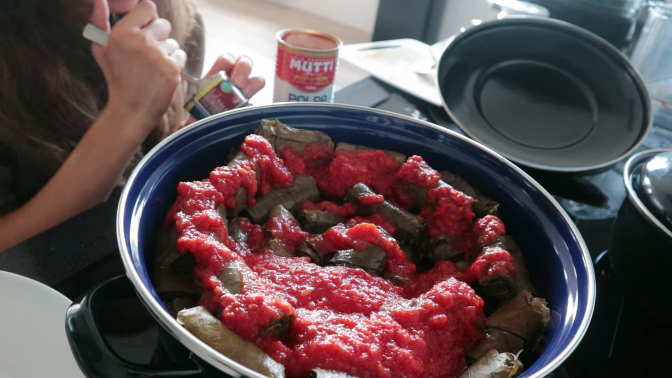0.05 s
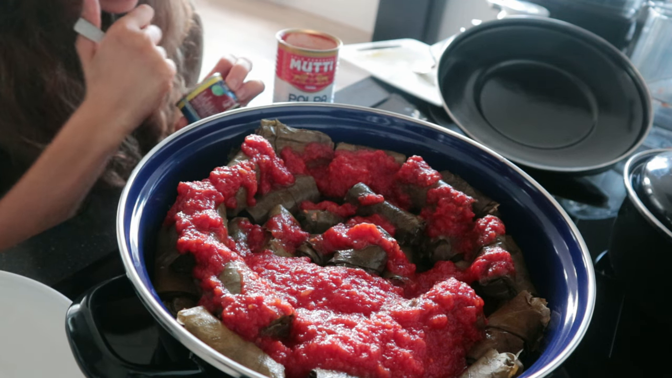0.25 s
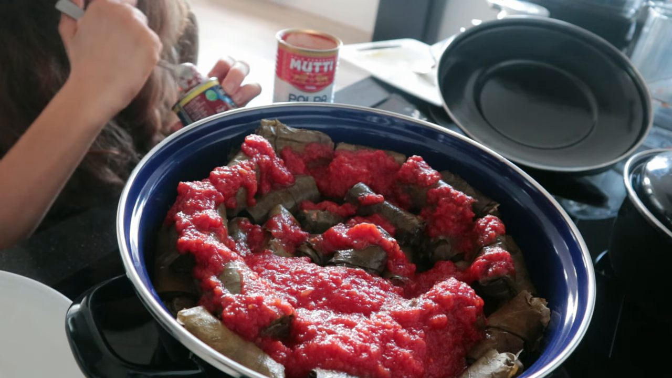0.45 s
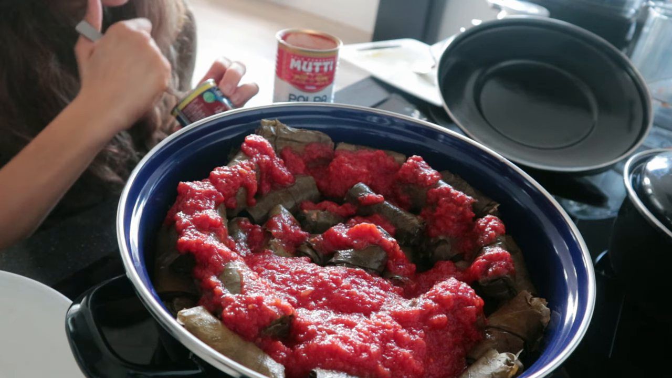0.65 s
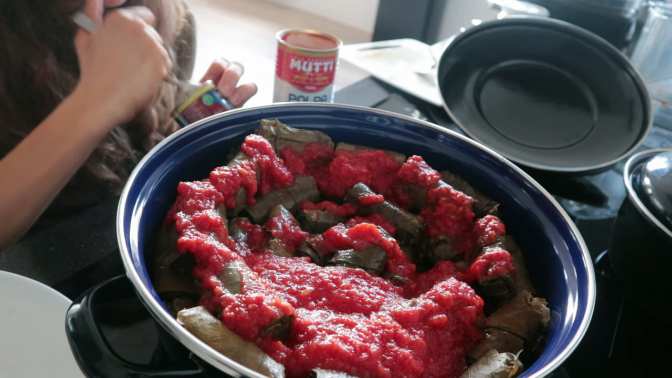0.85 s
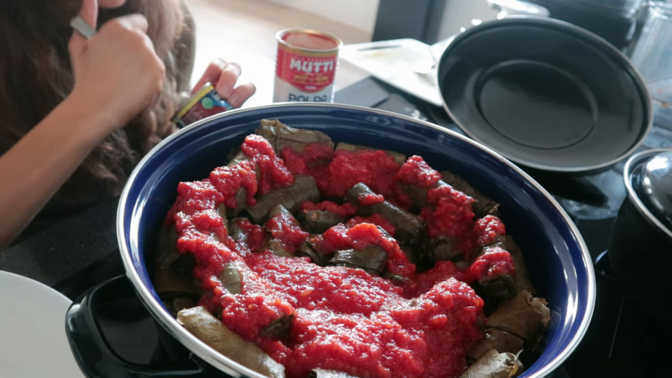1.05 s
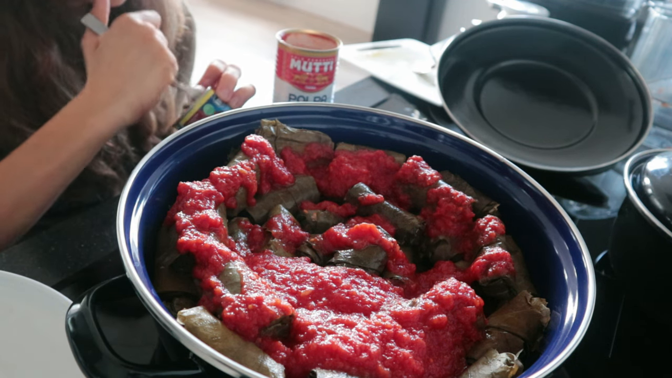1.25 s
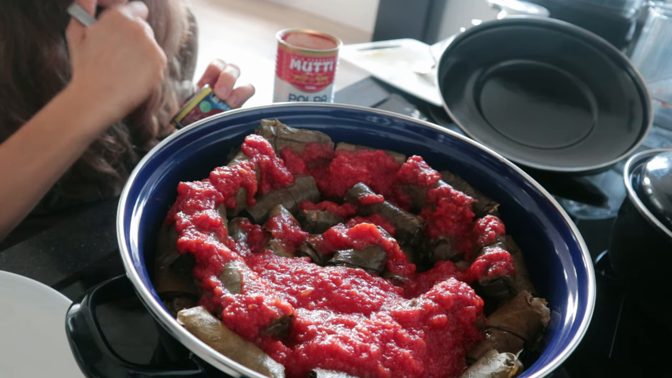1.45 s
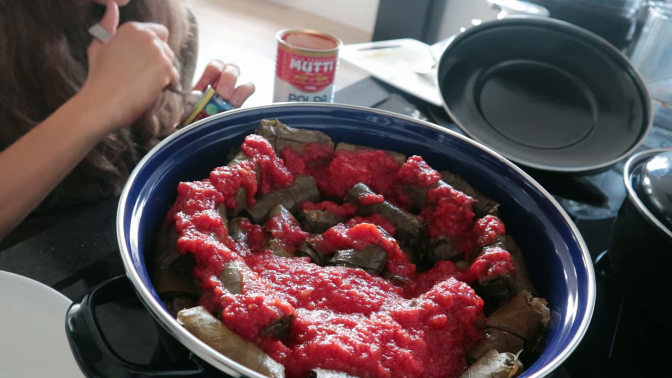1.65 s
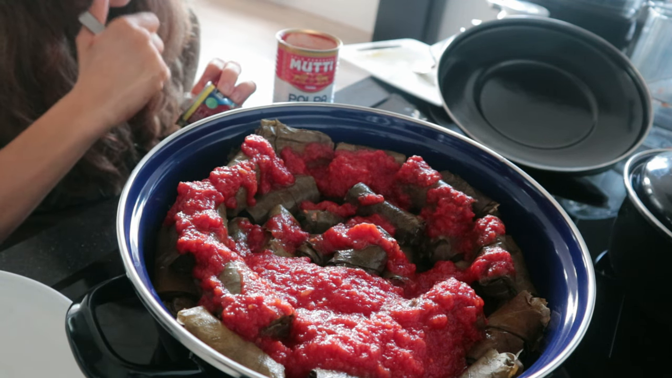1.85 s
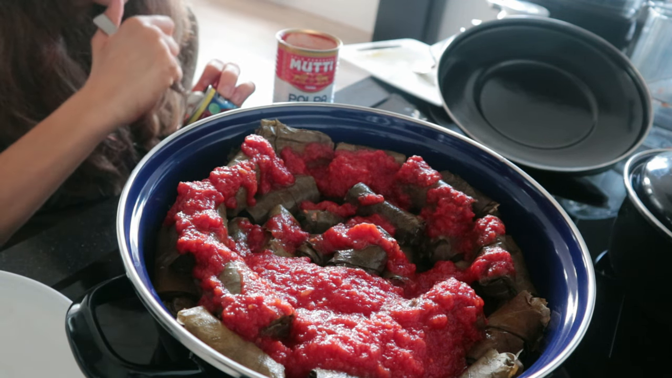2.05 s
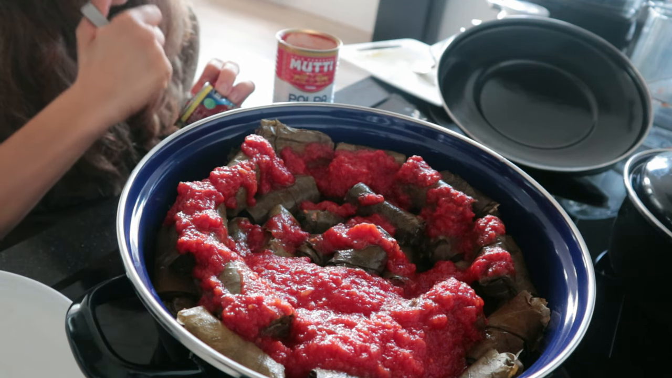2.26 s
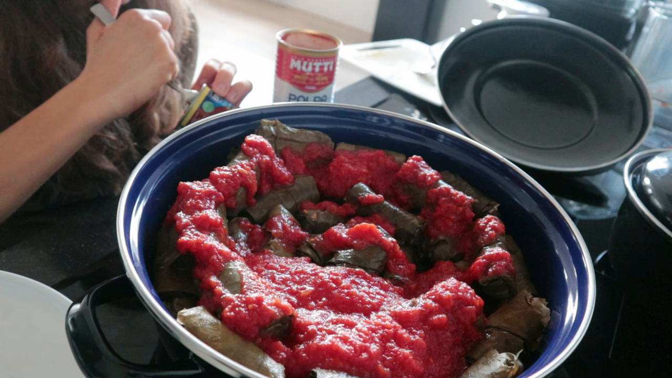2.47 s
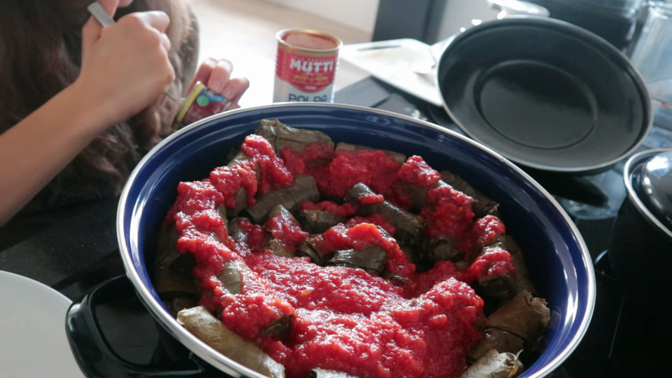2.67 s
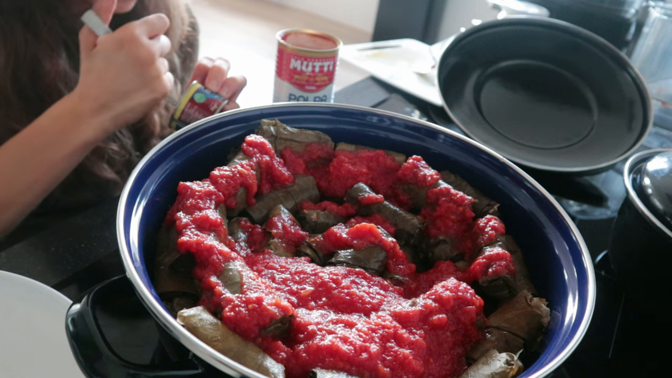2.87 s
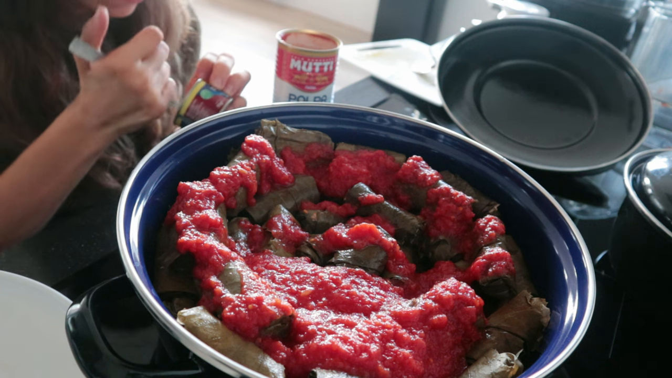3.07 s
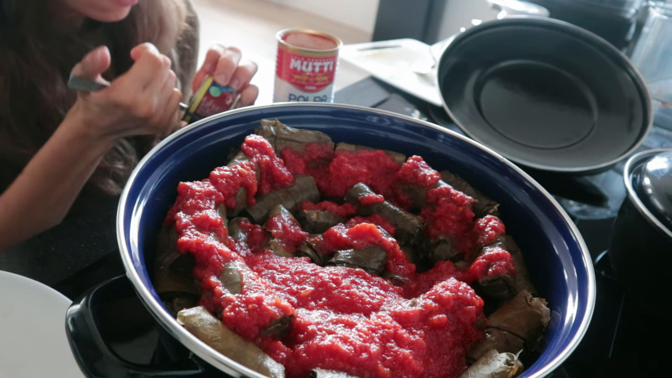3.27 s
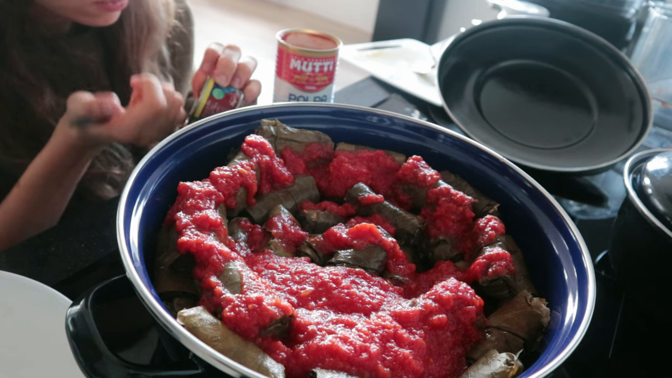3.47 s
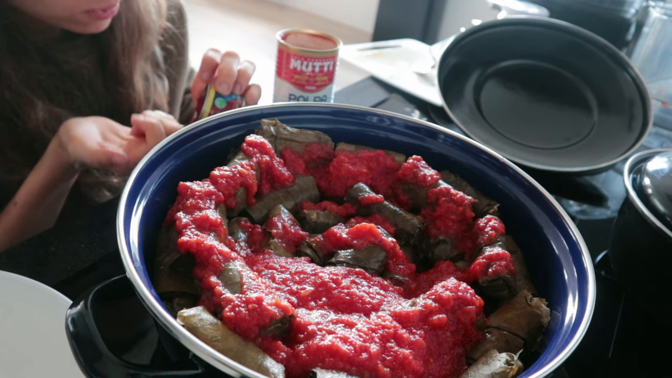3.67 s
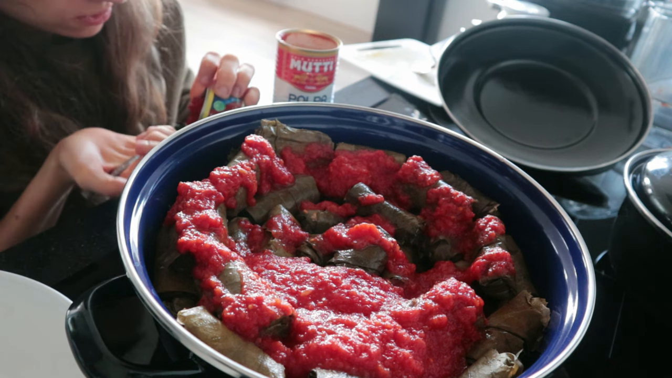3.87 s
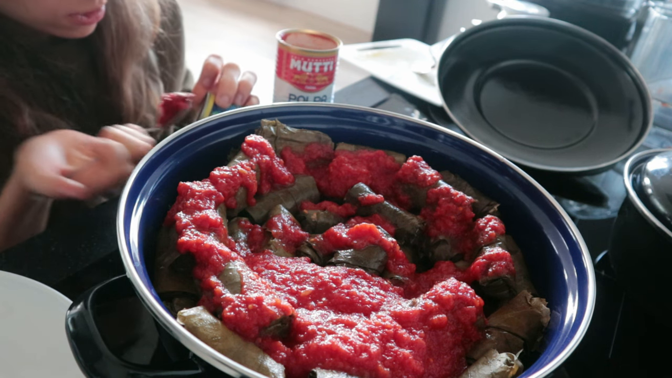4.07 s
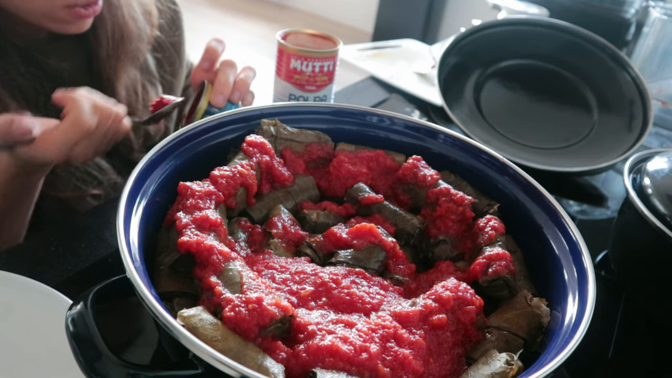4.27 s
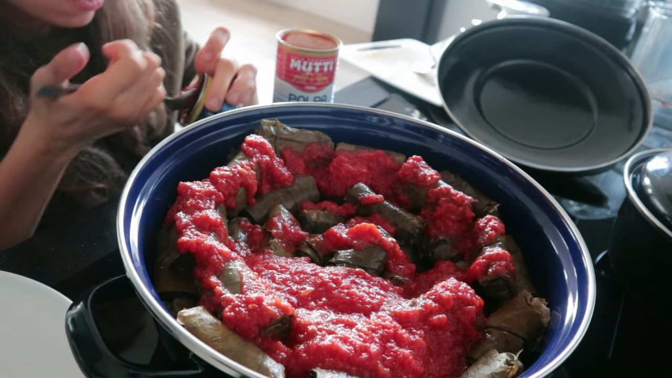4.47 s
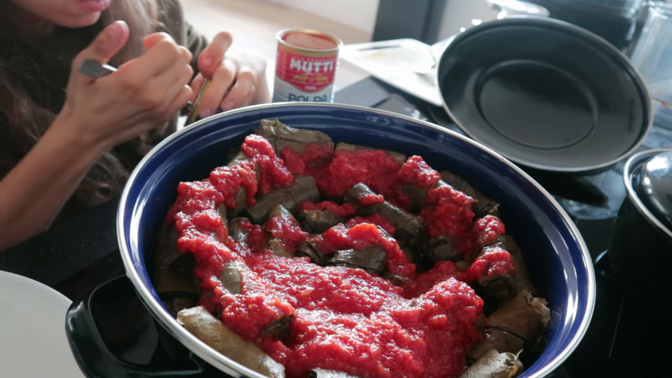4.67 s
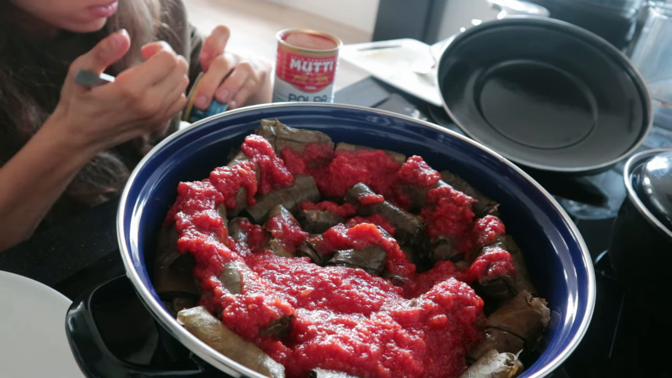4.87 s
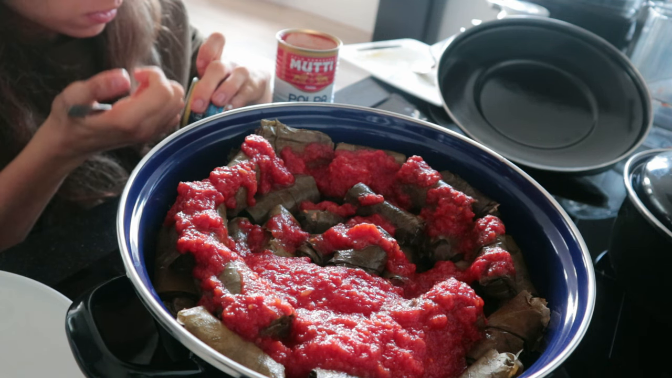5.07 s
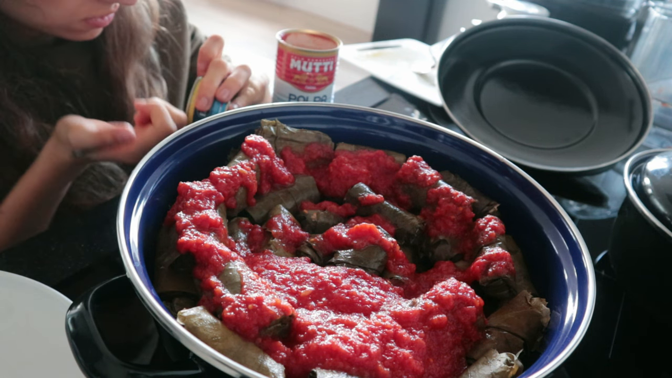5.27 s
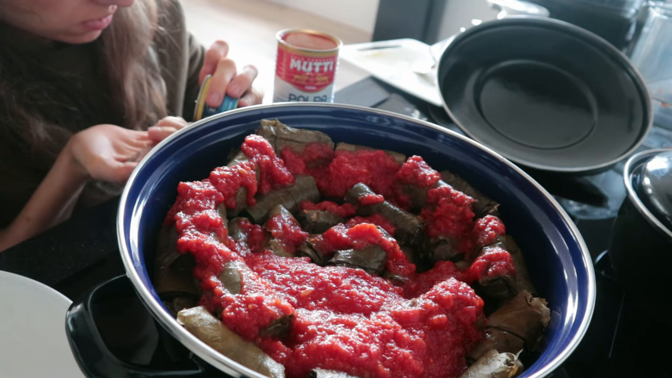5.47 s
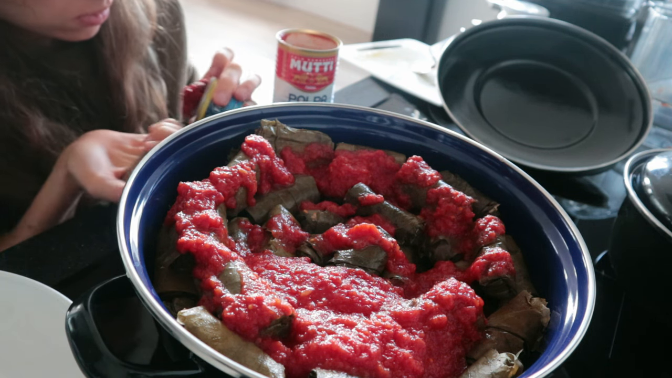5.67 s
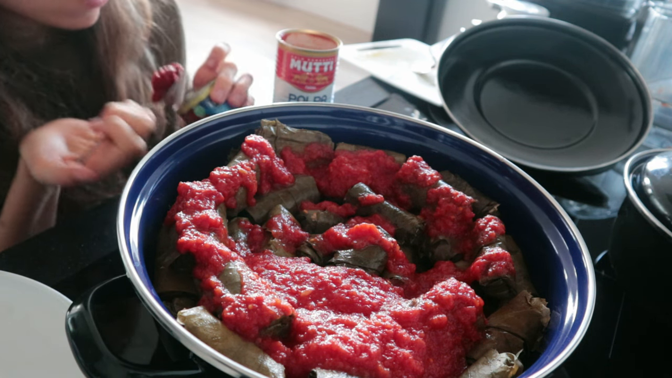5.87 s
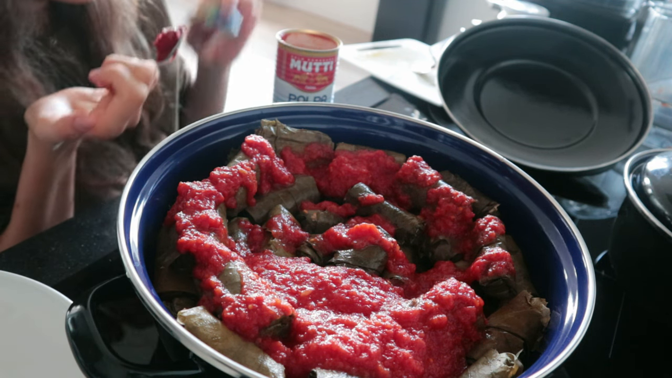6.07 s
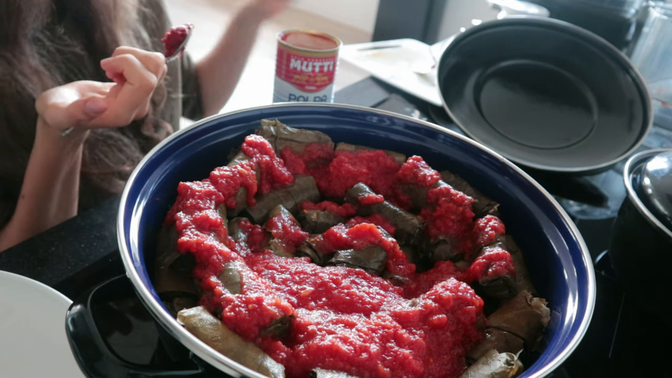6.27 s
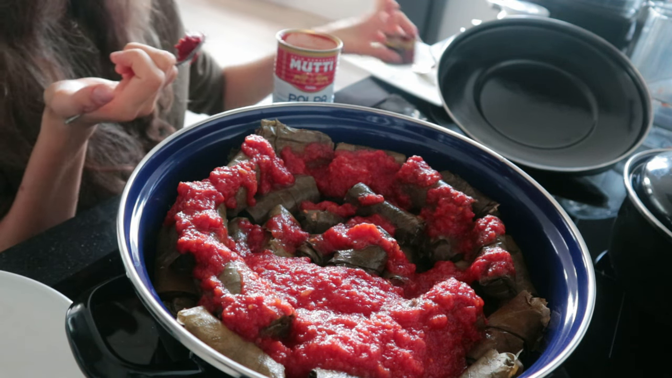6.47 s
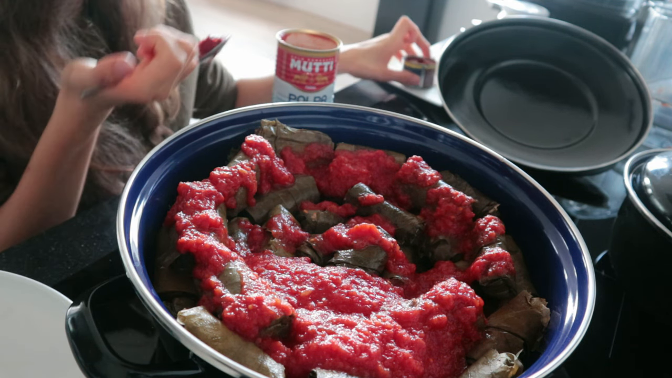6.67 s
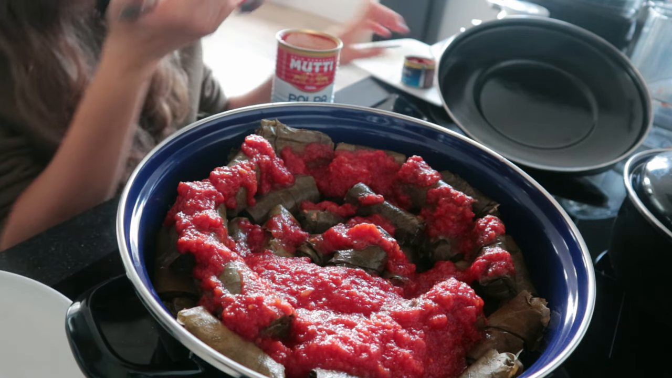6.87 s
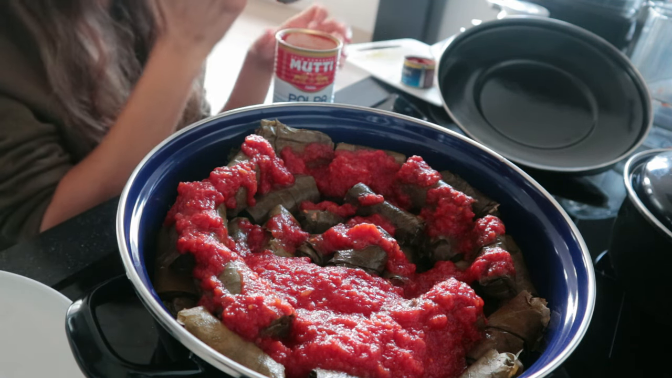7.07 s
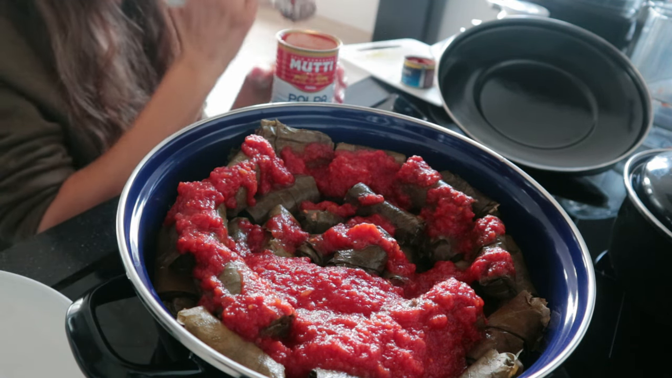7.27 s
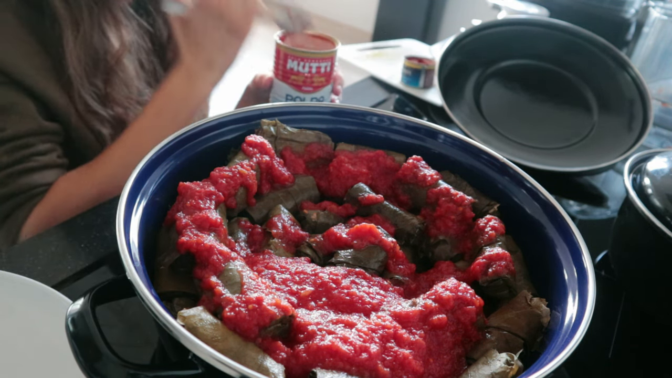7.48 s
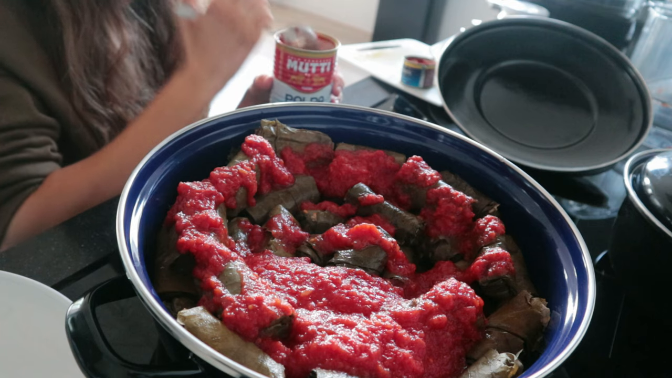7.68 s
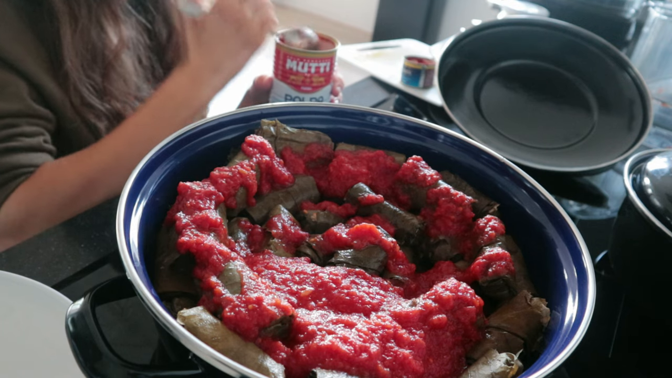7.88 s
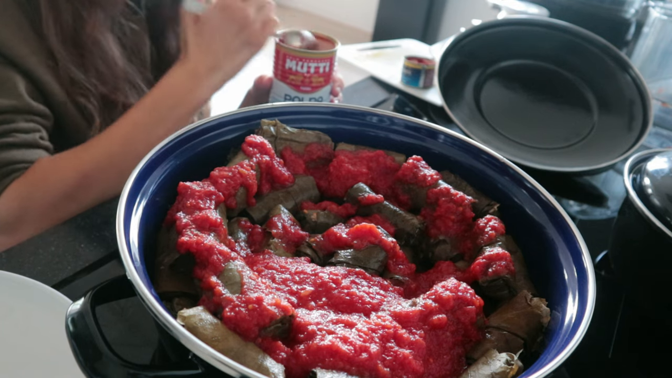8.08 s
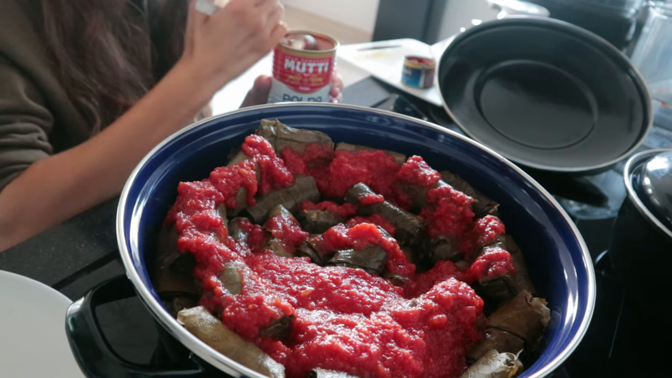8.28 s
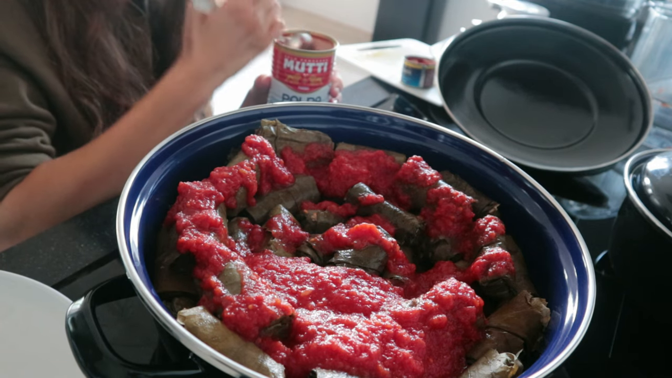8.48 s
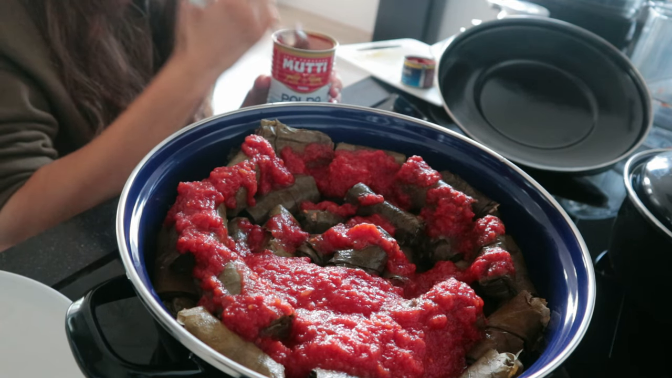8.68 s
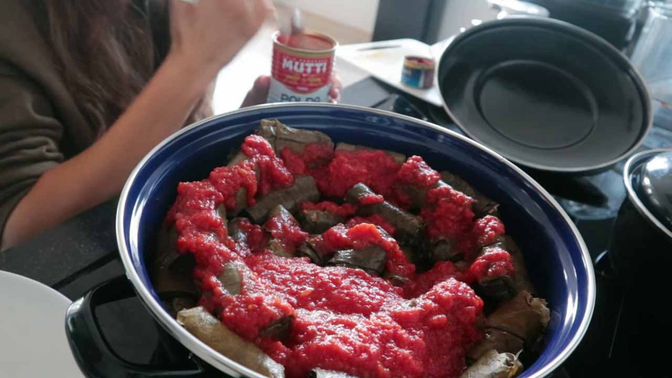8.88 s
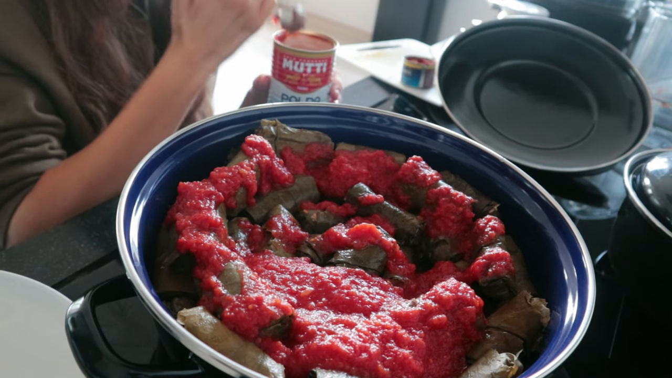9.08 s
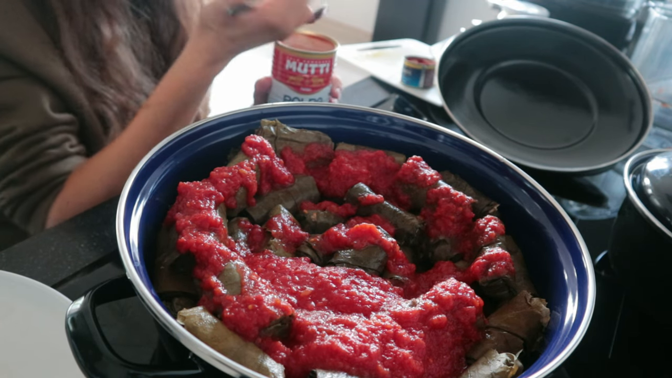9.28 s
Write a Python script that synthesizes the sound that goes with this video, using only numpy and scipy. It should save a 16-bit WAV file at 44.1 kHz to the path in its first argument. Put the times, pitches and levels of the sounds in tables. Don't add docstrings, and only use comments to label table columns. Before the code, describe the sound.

A metal spoon scrapes and lightly taps inside a small tin, the tin clacks down on glass, then ten hard knocks ring on a large can.

```python
import sys
import numpy as np
from scipy import signal
from scipy.fft import rfft, irfft
from scipy.io import wavfile
from scipy.ndimage import uniform_filter1d, map_coordinates

SR = 44100
rng = np.random.default_rng(int(sys.argv[2]) if len(sys.argv) > 2 else 0)


def generate_wav(sig):
    pcm = np.round(np.clip(np.atleast_2d(sig).T, -1, 1) * 32767).astype(np.int16)
    wavfile.write(sys.argv[1], SR, pcm)


def elevation(decibels):
    levels = np.asarray(decibels, float)
    return 10 ** (levels / 20)


N = 411453

# (time [s], peak [dB])
SET_DOWN = [
    (6.694, -11.5),
]
# (time [s], peak [dB], hollow ring [dB], landing [dB], thud [dB])
KNOCKS = [
    (7.386, -7.5, -25, -10.5, -20.5),
    (7.578, -6, -32, -23, -20.5),
    (7.752, -7, -29.5, -15, -19.5),
    (7.942, -6.5, -31, -12.5, -18),
    (8.134, -7, -27, -9, -17.5),
    (8.321, -7, -22, -6.5, -15.5),
    (8.511, -7, -24, -5, -16.5),
    (8.691, -5.5, -25.5, -9, -16.5),
    (8.866, -6, -19.5, -5.5, -19.5),
    (9.04, -11.5, -24.5, -24, -16.5),
]
# (frequency [Hz], level [dB], t60 [s])
RIM = [(1400, -10, 0.0073), (1790, -9.5, 0.1), (1998, 3.5, 0.041), (2143, -3.5, 0.038), (2300, -21, 0.034),
       (2560, -1, 0.056), (3287, 4, 0.033), (3534, -3.5, 0.025), (4113, -4, 0.03), (4440, -6, 0.044),
       (4600, -6, 0.053), (4951, 6.5, 0.025), (5800, -18, 0.025), (6013, 3, 0.013), (7200, 0.5, 0.015),
       (8570, 4, 0.015), (11150, -4, 0.008)]
# (frequency [Hz], level [dB], t60 [s])
BODY = [(420.6, -6, 0.068), (780, 3.5, 0.0033), (982, -2, 0.027), (1106, -3, 0.026), (1267, -5.5, 0.046),
        (1465, 0.5, 0.028), (1960, -10, 0.016), (3270, 2, 0.0082)]


def evened(x):
    return x / np.sqrt(np.mean(x ** 2) + 1e-20)


def read(points, hz):
    f, value = np.transpose(points)
    return np.interp(np.log(hz + 1), np.log(f + 1), value)


def add(mix, s, sound):
    part = mix[max(round(s * SR), 0):][:len(sound)]
    part += sound[:len(part)]


def colour(x, gain):
    spectrum = rfft(x) * gain(np.fft.rfftfreq(x.shape[-1], 1 / SR))
    return irfft(spectrum, x.shape[-1])


def resonate(x, hz, width):
    turn = np.exp(2j * np.pi * np.cumsum(hz * np.ones(len(x))) / SR)
    r = np.exp(-np.pi * width / SR)
    smooth = signal.lfilter([1 - r], [1, -r], x / turn + 1e-18)
    return 2 * (turn * smooth).real


def ring(modes, spread_db=1.5, detune=0.015, rise=0.00066):
    hz, db, t60 = np.transpose(modes)[:, :, None]
    t = np.arange(SR // 4) / SR
    level, pitch, phase = rng.standard_normal((3, len(modes), 1))
    decay = elevation(db + spread_db * level - 60 * t / t60)
    sound = (decay * np.sin(2 * np.pi * hz * (1 + detune * pitch) * t + phase)).sum(0)
    sound = sound * (1 - np.exp(-t / rise))
    return sound / abs(sound).max()


def tick(t60, low_hz):
    t = np.arange(SR // 4) / SR
    noise = rng.standard_normal(len(t))
    puff = colour(noise, lambda f: f ** 2 / (f ** 2 + low_hz ** 2) / (1 + (f / 11000) ** 6))
    puff = puff * elevation(-60 * t / t60)
    return puff / abs(puff).max()


def clatter(slower=1.0, rise=0.00044):
    # (frequency [Hz], density [dB per Hz], t60 [s])
    crowd = [(202, -36.5, 0.038), (595, -4, 0.094), (1030, -2.5, 0.02), (2500, -5.5, 0.081),
             (4670, 5.5, 0.026), (6100, -11.5, 0.07), (9200, -10.5, 0.017), (13400, -16.5, 0.025),
             (15900, -45, 0.014)]
    t, noise = np.arange(SR // 4) / SR, rng.standard_normal(SR // 4)
    hz, db, t60 = np.transpose(crowd)
    sound = 0
    for k in range(len(hz)):
        band = colour(noise, lambda f: np.interp(np.log(f + 1), np.log(hz), np.arange(len(hz)) == k))
        sound = sound + band * elevation(db[k] - 60 * t / (slower * t60[k]))
    sound = sound * (1 - np.exp(-t / rise))
    return sound / abs(sound).max()


def knock_dull(x):
    return colour(x, lambda f: 1 / (1 + 1j * f / 3500) ** 2)


def hum():
    # (frequency [Hz], level [dB per Hz])
    air_tone = [(12, -54), (20, -21), (37, -27), (77, -4.5), (130, -13.5), (168, -10.5), (337, -23),
                (410, -26.5), (513, -22.5), (3070, -31.5), (7730, -42.5), (9950, -46.5), (16000, -54)]
    # (frequency [Hz], correlation)
    likeness = [(60, 1.0), (180, 0.97), (550, -0.46), (1650, -0.42), (4970, -0.59), (15000, -0.49)]
    # (frequency [Hz], width [Hz], level [dB])
    fridge = [(82.4, 18, -55.5), (92.92, 5.1, -56), (162.2, 8, -55), (248.5, 24, -68.5), (415, 18, -73)]
    frames, hz = N // 512 + 5, np.fft.rfftfreq(2048, 1 / SR)
    a, b, c, d, patches = rng.standard_normal((frames, 1025, 5)).T
    patches = evened(uniform_filter1d(uniform_filter1d(patches, 20, 0), 8, 1))
    same = np.clip(read(likeness, hz), -1, 1)[:, None]
    left = a + 1j * b
    right = same * left + np.sqrt(1 - same ** 2) * (c + 1j * d)
    z = np.array([left, right]) * elevation(read(air_tone, hz)[:, None] + 0.71 * patches)
    air = elevation(-57) * evened(signal.istft(z, nperseg=2048, noverlap=1536)[1][:, :N])
    shake = rng.standard_normal(N)
    lines = sum(elevation(db) * evened(resonate(resonate(shake, f, w), f, 2 * w)) for f, w, db in fridge)
    return air + np.array([lines, np.roll(lines, shift=3)])


def grip(s):
    # (time [s], air pitch [Hz], air ring [dB], squeeze [dB])
    holds = [(0, 700, -25, 9.5), (.56, 930, -20, -4), (.67, 1030, 2, 2.5), (.91, 714, -11, 2.5),
             (.98, 793, -6, 1), (1.27, 700, -10, 1.5), (1.65, 712, 0, 2.5), (2.03, 810, -13, 0.5),
             (2.059, 839, 10.5, -3.5), (2.19, 740, -5, 4.5), (2.46, 910, 5, -3.5), (2.72, 770, 6.5, -8),
             (3.65, 717, -1, 3), (4.56, 700, 2, -9), (4.71, 836, 14, -4), (4.76, 850, -11, -2),
             (4.9, 704, 7.5, -9.5), (5.22, 726, 3.5, -1.5), (5.75, 696, 7.5, -11), (7.3, 700, 10, 2)]
    times, *columns = np.transpose(holds)
    return [np.interp(s, times, c) for c in columns]


def taps():
    # (time [s], ring [dB], middle mode [Hz],
    # high mode [Hz], edge over the ring [dB])
    tin_taps = [(0.0024, -29.5, 1268, 2090, -7.5), (0.1058, -46.5, 1860, 1905, 3),
                (0.5643, -51.5, 1820, 2010, 14.5), (0.6505, -53, 1290, 1960, 0),
                (0.6657, -41.5, 1080, 1970, 3), (0.9013, -51, 1280, 2350, 15.5),
                (0.9095, -25.5, 1455, 2300, -26), (0.9796, -29.5, 1416, 1720, -25),
                (1.102, -71, 1510, 1960, 20), (1.137, -70, 1450, 2000, 25.5), (1.235, -45.5, 1610, 1920, 6),
                (1.2665, -28.5, 1400, 2500, 0.5), (1.3554, -35, 1237, 2130, 0),
                (1.574, -45.5, 1230, 1830, -6), (1.6482, -29, 1277, 2000, -11),
                (2.0238, -40.5, 1396, 1870, 0.5), (2.0593, -35, 2740, 3780, 2),
                (2.183, -36, 1740, 2046, -5), (2.4074, -50.5, 1680, 2010, 2), (2.4549, -33, 1750, 2566, -8),
                (3.6515, -48.5, 1860, 2920, -11), (3.878, -56, 1570, 2690, -2),
                 (4.5563, -45.5, 1380, 3000, 7.5), (4.638, -55.5, 1310, 1970, 11),
                 (4.7004, -50, 1780, 2080, -18), (4.7455, -43.5, 1280, 1840, -13),
                 (4.9017, -52, 1764, 2120, 1), (5.029, -47, 1710, 1960, -5), (5.131, -37, 1673, 2160, -18),
                 (5.194, -44.5, 1700, 2110, 8), (5.2168, -34.5, 1730, 2650, -12),
                 (5.283, -66, 1660, 2150, -8), (5.3577, -42, 1770, 2080, -3), (5.4331, -36, 1790, 2250, 4),
                 (5.5251, -39.5, 1710, 2140, 0), (5.636, -50, 1695, 2080, 0),
                 (5.678, -49.5, 1655, 2120, 11),
                (.1635, -51, 1860, 1980, 1), (.2109, -55, 1900, 2070, 2), (.681, -47.5, 1120, 1970, -8),
               (.9607, -61, 1400, 2390, -3), (.987, -46, 1340, 1700, -15), (1.0196, -53, 1340, 2300, 5),
               (1.3179, -61, 1400, 2400, 0), (1.655, -38, 1200, 2190, -12), (1.661, -46, 1290, 1900, -12),
               (1.7384, -45.5, 1430, 2600, 4), (1.7913, -46, 1560, 2610, 1), (2.067, -40.5, 1730, 2210, -8),
               (2.196, -42.5, 1400, 2030, -4), (2.611, -51.5, 1270, 2770, 10), (2.642, -54, 1520, 2750, 9),
               (2.672, -53, 1400, 1920, 0), (4.745, -48.5, 1110, 2200, -20), (4.72, -51, 2110, 2600, -10),
               (3.737, -55, 1520, 1910, -10), (3.815, -59, 1500, 2000, -2), (4.9661, -62, 1700, 2170, 4),
               (5.0045, -53, 1720, 2020, -3), (5.247, -50, 1680, 2100, 0), (5.265, -44, 1590, 2070, -8),
               (5.3243, -58, 1700, 2100, 0), (5.4135, -48, 1790, 2100, 2), (5.44, -45, 1790, 2130, -6),
               (5.5517, -63.5, 1710, 2100, 0), (5.646, -49.5, 1700, 2100, 2)]
    mode_t60 = [0.099, 0.042, 0.027, 0.015]
    mode_rise = [0.0022, 0.0024, 0.0015, 0.0011]
    mode_db = [-12, -5, -3.5, -7]
    hand_s = 0.012
    bowl_hz = 7040
    bounce_s, bounce_db = 0.006, -16.5
    out = np.zeros(N)
    choke = 1 / (1 + (np.arange(SR // 4) / SR / hand_s) ** 4)
    for s, db, middle_hz, high_hz, edge_db in tin_taps:
        air_hz, air_db, squeeze_db = grip(s)
        top_hz = 3534 + 0.48 * (high_hz - 2070)
        hz = [air_hz, middle_hz, high_hz, top_hz]
        t60s = mode_t60 * elevation([0, 0, 0, 0.24 * squeeze_db])
        groups = []
        for f, rise, t60 in zip(hz, mode_rise, t60s):
            close = [(f, 0, t60), (f * 1.05, -9, t60), (f * 0.928, -11, t60)]
            groups.append(ring(close, spread_db=2.0, detune=0.0022, rise=rise) * choke)
        held_db = np.array([air_db, -squeeze_db, 0, 0.27 * squeeze_db + 0.29 * edge_db])
        add(out, s + 0.00055, elevation(db + held_db + mode_db) @ groups)
        dull_hz = bowl_hz * elevation(0.3 * edge_db)
        small = colour(clatter(slower=0.64, rise=0.00093), lambda f: 1 / (1 + 1j * f / dull_hz) ** 2)
        add(out, s + 0.0005, elevation(db - 3) * small + elevation(db + edge_db - 7.0) * tick(0.037, 3100))
    return out + elevation(bounce_db) * np.roll(out, round(bounce_s * SR))


def free_rings():
    # (time [s], frequency [Hz], level [dB], t60 [s])
    singing = [(.003, 2280, -46, 0.079), (.003, 3040, -51, 0.076), (.2, 3540, -59, 0.17),
               (.651, 3630, -44, 0.021), (0.908, 1370, -49, .06), (0.911, 2514, -37.5, 0.073),
               (0.981, 1333, -33.5, 0.052), (1.268, 1390, -43.5, 0.064), (1.267, 2350, -42, 0.058),
               (1.267, 3870, -44, 0.061), (1.356, 3600, -60, .05), (1.649, 2340, -37, 0.041),
               (1.778, 1580, -46, 0.074), (2.061, 3840, -48.5, 0.28), (2.061, 3980, -44, 0.16),
               (2.061, 2770, -58, 0.087), (2.454, 1796, -41, 0.14), (2.455, 2655, -46, 0.07),
               (2.61, 2760, -44, 0.06), (3.665, 2960, -45, .04), (4.557, 1324, -37, 0.16),
               (4.557, 4130, -45, 0.06), (4.557, 4780, -48, 0.069), (4.745, 980, -44, 0.025),
               (5.431, 2073, -33, 0.081), (5.636, 2107, -46.5, 0.23), (6.695, 2030, -24.5, 0.046),
               (6.695, 755, -35, .15), (6.695, 2620, -29, 0.03), (6.695, 1150, -27, 0.02),
               (6.72, 2067, -46, 0.74), (6.695, 3200, -38, .025), (2.456, 2610, -47.5, 0.17),
               (3.68, 3450, -49, .05), (3.911, 3110, -54, .08), (4.64, 1340, -49, 0.071),
               (.911, 3840, -48, 0.07), (1.02, 3600, -51, 0.044), (.003, 3340, -55, 0.22),
               (.106, 1940, -51, .12), (2.5, 4180, -61, .06), (1.36, 1200, -54, 0.068),
               (4.557, 1900, -42, 0.046), (5.13, 3410, -48, 0.11), (5.2, 3430, -51, 0.18),
               (8.87, 714, -29, 0.5), (9.045, 706, -34.5, 0.49)]
    rough_db, wander = 4.0, 0.005
    twin_pitch, twin_db = 1.03, -6.5
    out, t = np.zeros(N), np.arange(SR // 4) / SR
    fade = (1 - np.exp(-t / 0.0011)) * np.hanning(SR // 2)[-len(t):]
    for s, hz, db, t60 in singing:
        noises = rng.standard_normal((2, len(t)))
        level, pitch = [evened(uniform_filter1d(uniform_filter1d(n, size=300), size=300)) for n in noises]
        turn = 2 * np.pi * hz * np.cumsum(1 + wander * pitch) / SR
        twins = np.sin(turn) + elevation(twin_db) * np.sin(turn * twin_pitch)
        flutter_db = rough_db * level * np.minimum(t / 0.018, 1)
        add(out, s, elevation(db - 60 * t / t60 + flutter_db) * fade * twins)
    return out


def stroke(start, hardest, end, top_db, hz, grit_db, rasp_db):
    # (factor on wall resonance, width [Hz], level [dB])
    wall_modes = [(.78, 80, 34), (1, 170, 37.5), (1.27, 89.4, 34)]
    # (frequency [Hz], width [Hz], level [dB])
    upper_modes = [(2704, 71, 1), (3240, 1740, 7.5), (3540, 110, -1), (4170, 200, -10), (4940, 200, -5),
                   (6100, 220, -6.5), (7300, 250, -19)]
    # (frequency [Hz], level [dB per Hz])
    rasp_tone = [(3500, -15), (4800, -2), (7500, -10), (11000, -10.5), (13500, -18), (16000, -60)]
    t = np.arange(start, end, 1 / SR)
    n = len(t)
    away_db = np.where(t < hardest, -7.5, -24.5)
    ease_db = away_db * np.interp(t, [start, hardest, end], [1, 0, 1]) ** 1.52
    air_hz, air_db, _ = grip(t)
    hollow_db = -11 + air_db - 0.93 * ease_db
    slips = rng.standard_normal(n) * elevation(1.2 * rng.exponential(1, n)) * (rng.random(n) < 6000 / SR)
    slips = slips * elevation(3.0 * evened(uniform_filter1d(rng.standard_normal(n), 350)))
    wall = sum((-1) ** k * elevation(db) * evened(resonate(slips, hz * f, w))
               for k, (f, w, db) in enumerate(wall_modes))
    wander = 1 + 0.03 * evened(uniform_filter1d(rng.standard_normal(n), 3000))
    grit = sum((-1) ** k * elevation(db) * evened(resonate(slips, f * wander, w))
               for k, (f, w, db) in enumerate(upper_modes))
    rasp = elevation(rasp_db) * evened(colour(slips, lambda f: elevation(read(rasp_tone, f))))
    hollow = elevation(hollow_db) * evened(resonate(resonate(slips, air_hz, 35), air_hz, 177))
    tin = evened(wall) + elevation(grit_db) * evened(grit) + rasp + hollow
    return start, elevation(top_db + ease_db) * tin * signal.windows.tukey(n, .25)


def small_tin():
    # (start [s], hardest [s], end [s], pressure [dB], wall resonance [Hz])
    grinds = [
        (.02, .04, .2, -61, 1920),
        (.2, .23, .29, -67, 1780),
        (3.66, 3.68, 3.72, -55.5, 1730),
        (3.8, 3.82, 3.85, -60, 1650),
        (3.87, 3.92, 3.95, -59, 1580),
        (5.12, 5.14, 5.17, -56, 1630),
        (5.19, 5.24, 5.3, -55, 1720),
        (5.45, 5.55, 5.66, -59, 1620),
    ]
    # (start [s], hardest [s], end [s], pressure [dB], wall resonance [Hz])
    skids = [
        (.57, .578, .61, -63, 1880),
        (.65, .68, .71, -68, 1900),
        (1.6, 1.64, 1.65, -61, 1750),
        (1.7, 1.74, 1.77, -62, 1700),
        (1.76, 1.79, 1.88, -58, 1540),
        (2.59, 2.615, 2.72, -55, 1550),
        (4.63, 4.65, 4.68, -66.5, 1380),
        (5.19, 5.21, 5.24, -55, 1700),
        (5.62, 5.67, 5.74, -58, 1960),
    ]
    # (start [s], hardest [s], end [s],
    # pressure [dB], wall resonance [Hz])
    drags = [(3.71, 3.74, 3.79, -58.5, 1560), (3.93, 3.97, 4.01, -57, 1600), (4.7, 4.75, 4.78, -60.5, 1520),
             (4.9, 4.92, 4.96, -62, 1670), (4.95, 4.98, 5.01, -59, 1640), (5.01, 5.04, 5.08, -55.5, 1650),
             (5.122, 5.136, 5.17, -45, 1610), (5.23, 5.25, 5.3, -46, 1675), (5.29, 5.36, 5.43, -70, 1580),
             (5.43, 5.44, 5.47, -42.5, 1790), (7.335, 7.357, 7.384, -54, 1790)]
    out = taps() + free_rings()
    # (strokes, grit over the wall [dB], rasp over the wall [dB])
    for rows, grit_db, rasp_db in ((grinds, -3.5, -11), (skids, 2.5, -1), (drags, -5, -24)):
        for row in rows:
            add(out, *stroke(*row, grit_db, rasp_db))
    return colour(out, lambda f: 1 / (1 + (f / 13500) ** 8))


def tin_set_down():
    # (frequency [Hz], level [dB], t60 [s])
    tin_modes = [(815, -12, 0.051), (1080, -30, 0.018), (1200, 4.5, 0.039), (1710, -2, 0.036),
                 (1950, 13, 0.016), (2010, -16, 0.039), (2680, 9.5, 0.021), (3170, 10, 0.014),
                 (3980, 4.5, 0.015), (4780, 5, 0.013), (6060, -14, 0.02), (6750, -21, 0.013)]
    out = np.zeros(N)
    low_pass = signal.butter(8, 11500, fs=SR, output='sos')
    for s, db in SET_DOWN:
        base = ring(tin_modes, spread_db=1.5, detune=0.0026, rise=0.00094)
        base = base + elevation(-22.5) * tick(.015, 6000)
        base = base + elevation(-9.5) * knock_dull(clatter(slower=0.77, rise=0.00097))
        add(out, s, elevation(db - 1.0) * signal.sosfilt(low_pass, base))
    return out


def spoon_rests():
    # (time [s], peak [dB])
    touches = [
        (7.067, -45),
        (9.212, -12.5),
    ]
    # (frequency [Hz], level [dB], t60 [s])
    touch_modes = [(663, -12, 0.06), (727, -5, 0.076), (785, -2, 0.018), (1150, 1, 0.0063)]
    out = np.zeros(N)
    for s, db in touches:
        add(out, s, elevation(db - 9.5) * ring(touch_modes, spread_db=-1.0, detune=0.0027, rise=0.00024))
    return out


def can_knocks():
    # (frequency [Hz], level [dB], t60 [s])
    can_air = [(700, 2.5, 0.14), (726, -1, 0.054), (629, -4.5, 0.091)]
    # (frequency [Hz], level [dB], t60 [s])
    glass = [(225, 1.5, 0.049), (245.2, -6.5, 0.11), (306.5, 5.5, 0.036)]
    out = np.zeros(N)
    for s, db, hollow_db, land_db, thud_db in KNOCKS:
        s = s + 0.001123
        blow = ring(RIM, spread_db=1.0, detune=0.0061) + elevation(-1.0) * clatter(slower=0.85)
        blow = blow + elevation(-10.0) * ring(BODY, spread_db=0.0, rise=0.0012)
        blow = blow + elevation(-16.0) * ring([(735, 0, 0.012)], spread_db=1.5, rise=0.0021)
        add(out, s, elevation(db) * blow)
        landing = ring(BODY, spread_db=3.5) + elevation(1.0) * clatter(slower=0.32)
        landing = landing + elevation(-1.5) * ring(RIM, spread_db=4.0)
        add(out, s + 0.009, elevation(db + land_db - 2.5) * landing)
        hollow = ring(can_air, spread_db=-3.0, detune=0.0096, rise=0.0005)
        add(out, s + 0.00609, elevation(db + hollow_db + 9.0) * hollow)
        add(out, s + 0.00454, elevation(db + thud_db + 6.0) * ring(glass, spread_db=2.0, rise=0.0084))
    return out


def rocking():
    first_hz, last_hz, length_s, level_db = 165, 232, 0.105, -32
    boom_hz, boom_db, boom_t60 = 100, -35.5, 1
    out, u = np.zeros(N), np.arange(0, length_s, 1 / SR) / length_s
    for s, db, *_ in KNOCKS:
        hz = (first_hz + (last_hz - first_hz) * u) * (1 + 0.031 * rng.standard_normal())
        shape = signal.windows.tukey(len(u), .3) * elevation(db + level_db + 1.5 * rng.standard_normal())
        shape = shape * (1 + .4 * np.cos(2 * np.pi * (3 * u ** 1.3 + rng.random())))
        add(out, s + 0.0039, shape * np.sin(2 * np.pi * np.cumsum(hz) / SR))
        boom = ring([(boom_hz, boom_db, boom_t60)], rise=0.066) * np.hanning(SR // 2)[-SR // 4:]
        add(out, s, elevation(db + boom_db) * boom)
    return out


def can_rattles():
    # (time [s], peak [dB])
    rattles = [
        (7.6, -34),
        (8.146, -21),
        (8.339, -32),
        (8.528, -25),
        (8.711, -22),
        (8.882, -17.5),
        (9.053, -17),
        (9.058, -26),
    ]
    out = np.zeros(N)
    for s, db in rattles:
        rattle = ring(RIM, spread_db=9.0) + elevation(-3.5) * ring(BODY) + elevation(-1.5) * clatter(slower=0.7)
        add(out, s, elevation(db) * rattle)
    return out


def blows():
    # (frequency [Hz], level over the peak [dB])
    blow_tone = [(300, 7.5), (800, 22), (2000, 27.5), (3500, 25.5), (5000, 25), (7000, 14.5), (9000, 7.5),
                 (13000, -5)]
    knocks, set_down = np.zeros((2, N))
    for s, db, *_ in KNOCKS:
        add(knocks, s + .004, elevation([db]))
    for s, db in SET_DOWN:
        add(set_down, s + 0.0044, elevation([db - 0.5]))
    return colour(knocks + knock_dull(set_down), lambda f: elevation(read(blow_tone, f)))


def all_round(x, sway_s):
    sway = evened(uniform_filter1d(uniform_filter1d(rng.standard_normal(N), size=36), size=36))
    return map_coordinates(x, [np.arange(N) + sway_s * SR * sway], order=3)


def ports(x, lead, balance):
    side = np.array([[.5], [-.5]])
    return colour(x, lambda f: elevation(side * read(balance, f)) * np.exp(1j * side * read(lead, f)))


def kitchen(x):
    # (frequency [Hz], t60 [s])
    room_t60 = [(200, 0.8), (660, 0.72), (1740, 0.66), (4590, 0.68), (9000, 0.52), (14000, 0.48)]
    # (frequency [Hz], level [dB])
    tail_tone = [(150, -2), (700, -7), (2000, -7), (5000, -12), (8500, -5), (14000, -16.5)]
    # (frequency [Hz], correlation)
    likeness = [(300, 0.98), (1400, 0.91), (2500, 0.77), (4500, 0.33), (6000, -0.017), (9000, -0.84),
                (14000, -0.5)]
    early_db, early_t60 = 13.4, 0.059
    build_s = 0.0097
    out, turn = np.zeros((2, N)), np.arange(N) / SR * 2.3
    for k in range(3):
        echoes = np.zeros((2, SR))
        at = np.arange(220, SR - 20, 20) + rng.integers(0, 20, (2, (SR - 221) // 20))
        np.put_along_axis(echoes, at, rng.choice([-1., 1.], at.shape), 1)
        hz, t, z = signal.stft(echoes, SR, nperseg=256)
        like = np.clip(read(likeness, hz), -1, 1)[:, None]
        z = np.array([z[0], like * z[0] + np.sqrt(1 - like ** 2) * z[1]])
        decay = elevation(-60 * t / read(room_t60, hz)[:, None])
        decay = decay * (1 + elevation(early_db - 60 * t / early_t60)) * (1 - np.exp(-(t / build_s) ** 2))
        z = z * decay / np.linalg.norm(decay, axis=1, keepdims=True)
        tail = signal.istft(z, SR, nperseg=256)[1]
        tail = colour(tail / np.linalg.norm(tail[0]), lambda f: elevation(read(tail_tone, f)))
        share = np.cos(np.pi * (turn + k / 3))
        out += signal.fftconvolve(x[None] * share, tail, axes=1)[:, :N]
    return out * np.sqrt(2 / 3)


def scene():
    # (frequency [Hz], lead [rad])
    tin_lead = [(300, .1), (1400, 0.21), (3400, 0.78), (4500, 1.56), (6500, 2.22), (9500, 1.85),
                (15000, 0.64)]
    # (frequency [Hz], left over right [dB])
    tin_balance = [(60, -0.082), (380, -0.57), (2380, -2.1), (15000, -0.44)]
    # (frequency [Hz], lead [rad])
    can_lead = [(300, 0.14), (700, 0.047), (1400, 0.74), (2400, 0.54), (5000, 0.88), (6500, -2),
                (8000, -0.88), (15000, -2)]
    # (frequency [Hz], left over right [dB])
    can_balance = [(60, 2), (240, -1), (950, -1.3), (2400, -2.5), (15000, -3)]
    tin = small_tin()
    on_hob = tin_set_down() + spoon_rests() + can_knocks() + can_rattles()
    direct = ports(tin, tin_lead, tin_balance) + ports(on_hob, can_lead, can_balance) + rocking()
    walls = elevation(1.5) * all_round(tin, sway_s=.00006)
    walls = walls + elevation(-11) * all_round(on_hob, sway_s=.00012)
    walls = walls + blows()
    return direct + kitchen(walls) + hum()


def band_limit(x):
    return signal.sosfilt(signal.butter(12, 16810, fs=SR, output="sos"), x)


def record(dry):
    soft = 1.006 * np.tanh(dry / 0.86)
    mix = colour(soft, lambda f: 1 / (1 + (f / 14800) ** 14) * (f < 16800))
    return band_limit(mix)


dry = scene()
out = record(dry)
generate_wav(out)
```